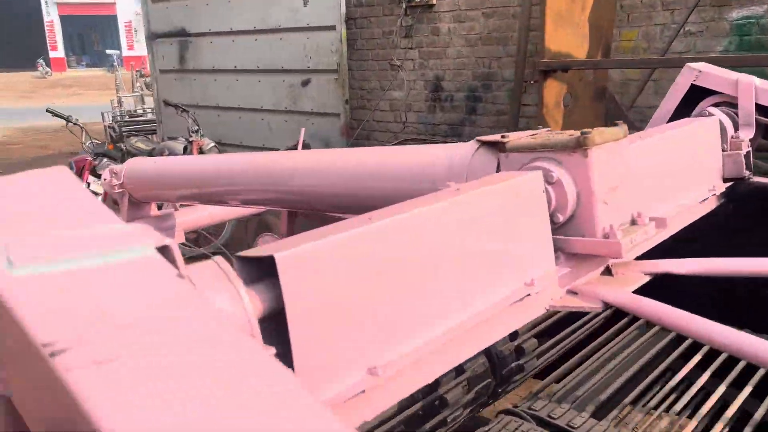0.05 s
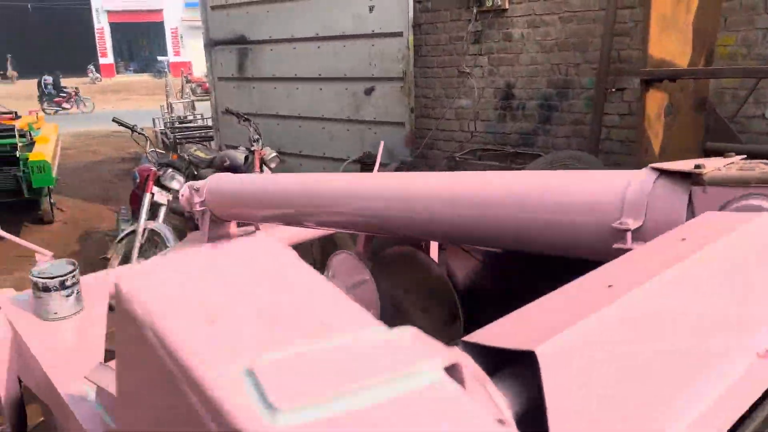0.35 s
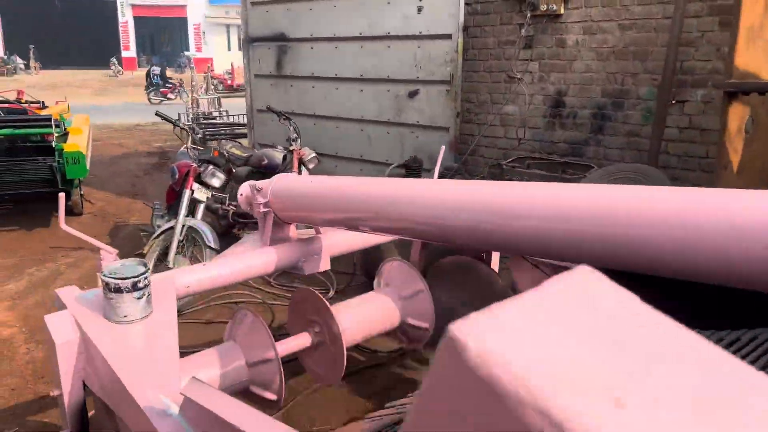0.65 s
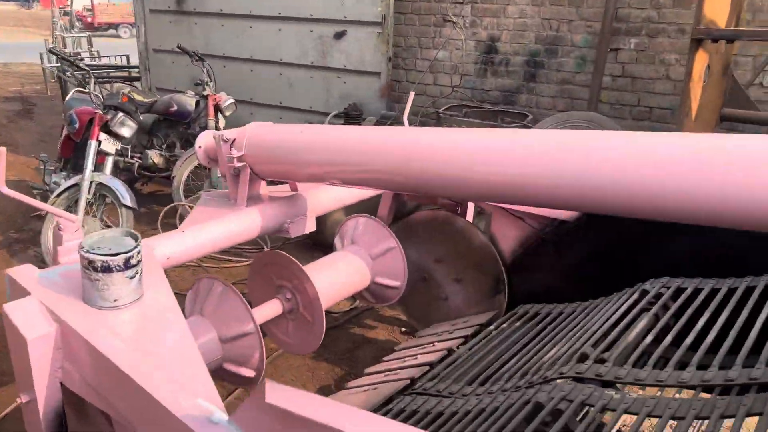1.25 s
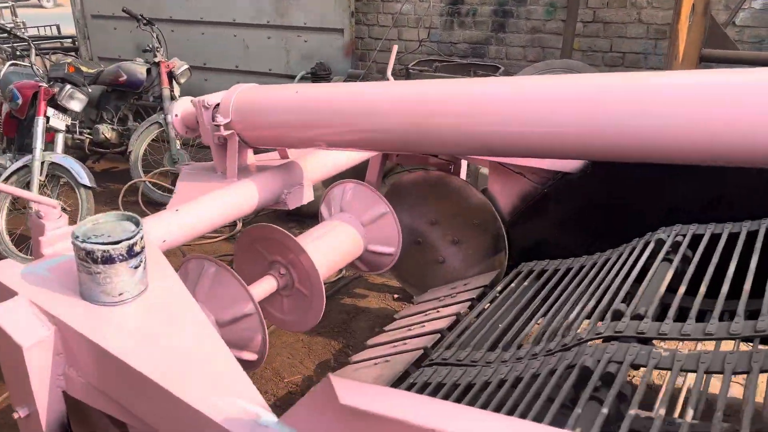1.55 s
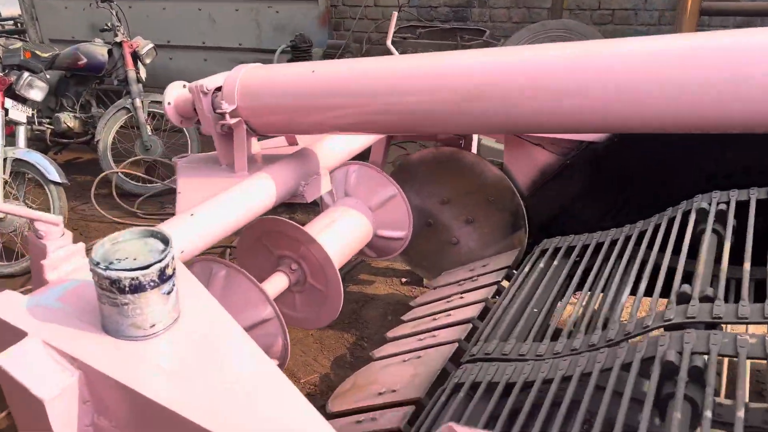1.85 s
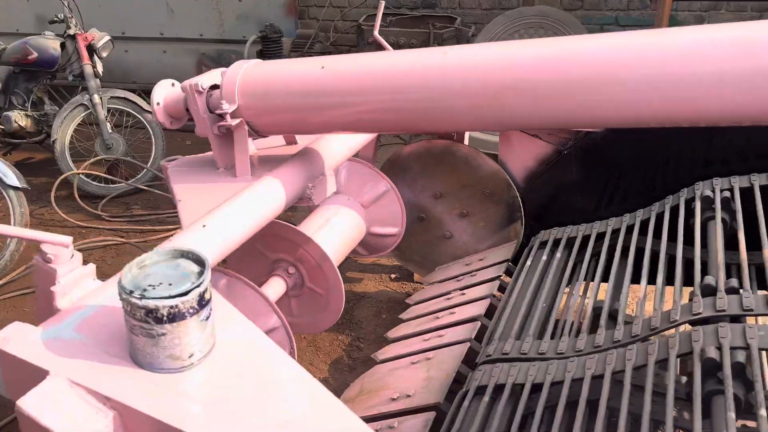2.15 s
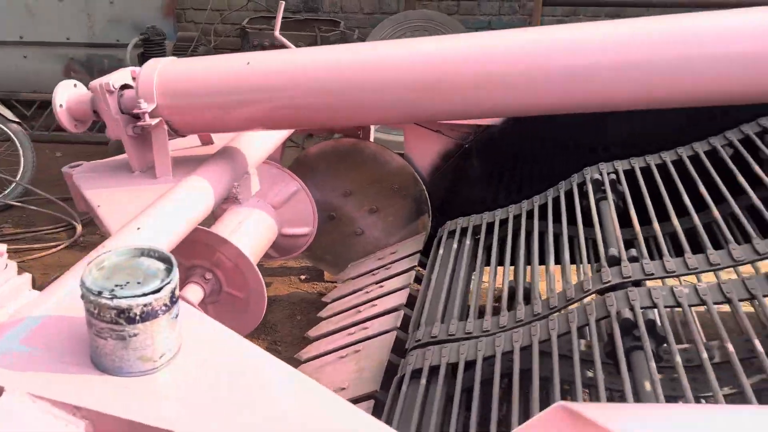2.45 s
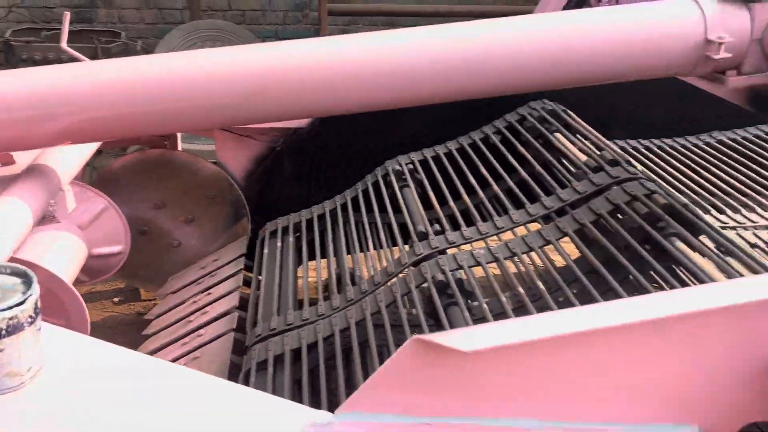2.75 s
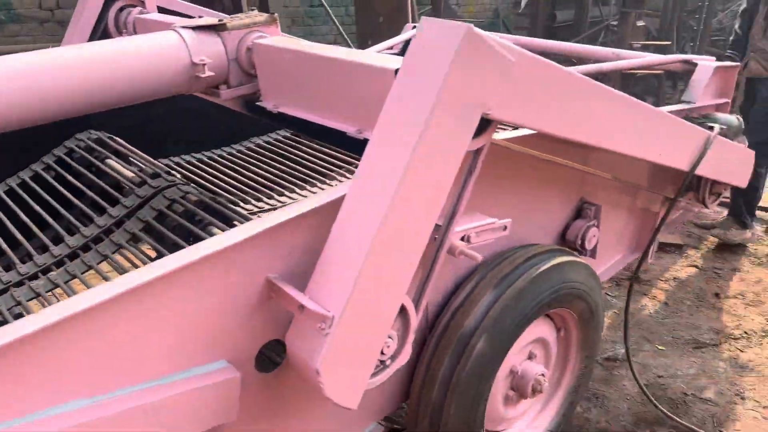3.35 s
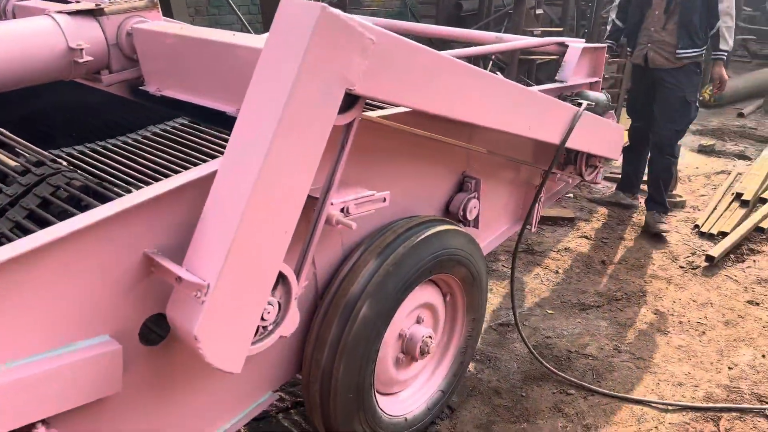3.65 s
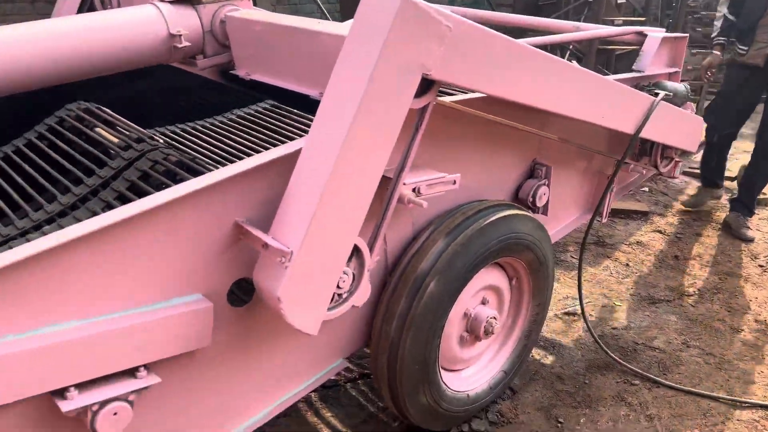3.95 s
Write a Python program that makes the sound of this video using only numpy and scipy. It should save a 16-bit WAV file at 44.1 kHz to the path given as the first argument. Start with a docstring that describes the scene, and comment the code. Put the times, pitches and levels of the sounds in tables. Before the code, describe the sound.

An engine runs steadily close by, a deep drone with a clattering metal casing. Air hisses on the left over a workshop yard's rumble. Near the end the engine sags slightly and something loose ticks quickly.

```python
"""A workshop yard, the microphone carried past a parked farm machine with its engine running steadily.
The exhaust drones at twice the shaft rate; the casing, shaken once a turn, clatters and rings.
A second, fainter engine hums further off over the rumble and roar of the yard; air hisses on the left.
Near the end the engine sags a little, the yard grows louder and something loose ticks in time
with the shaft, amid a fine sizzle."""
import sys
import numpy as np
from scipy import signal
from scipy.fft import rfft, irfft
from scipy.io import wavfile

SR = 44100
rng = np.random.default_rng(int(sys.argv[2]) if len(sys.argv) > 2 else 0)


def store_wav(level_fs):
    """Save 16-bit WAV to argv[1]."""
    pcm = np.round(np.clip(np.atleast_2d(level_fs), -1, 1) * 32767)
    wavfile.write(sys.argv[1], SR, pcm.T.astype(np.int16))


N = 176400
T = np.arange(N) / SR


# The near engine's shaft: time_s, turns_per_s
SHAFT_SPEED = [(0.15, 32.43), (0.4, 32.3), (1.3, 32.3), (2.1, 32.34), (2.65, 32.44), (2.95, 32.25),
               (3.25, 31.28), (3.8, 31.38)]
def shaft(jitter=0.0034):
    """Running count of the turns of a shaft whose speed is never quite even."""
    return np.cumsum(curve(SHAFT_SPEED) * (1 + jitter * wander(16.0))) / SR


# The drone at the microphone: time_s, level_db
DRONE_LEVEL = [(0.05, -24), (0.38, -17), (0.92, -13), (1.66, -11), (3.02, -10.5), (3.22, -12.5),
               (3.44, -11.5), (3.93, -11.5)]
# The overtones above it: time_s, third_order_db, fourth_order_db, other_orders_db
ORDER_LEVELS = [(0.1, -32, -27.5, -30.5), (.65, -32.5, -29.5, -33), (1.15, -31, -33, -35),
                (1.5, -34, -32, -30), (1.95, -24.5, -32, -34.5), (2.9, -32, -30, -40),
                (3.17, -21, -31.5, -29), (3.5, -24.5, -25, -28.5), (4, -32, -27, -39)]
# Balance of those other orders: shaft_multiple, relative_db
OTHER_ORDERS = [(1, -18), (1.5, -19), (5, -1.5), (6, -6), (7, -9), (8, -12), (10, -16), (12, -20),
                (14, -16.5)]
def exhaust(turns):
    """The exhaust, close by: a deep drone of two pulses a turn, with clean and wavering overtones."""
    angle = 2 * np.pi * turns
    drone = unit(np.cos(2 * angle) * (1 + 0.021 * wander(25))) * amp(curve(DRONE_LEVEL))
    third = unit(np.cos(3 * angle)) * amp(curve(ORDER_LEVELS))
    fourth = unit(np.cos(4 * angle)) * amp(curve(ORDER_LEVELS, column=2))
    others = orders(turns, OTHER_ORDERS, waver=0.075, rate_hz=5.9) * amp(curve(ORDER_LEVELS, column=3))
    return (drone + third + fourth + others) * pan(left_db=-0.4)


# Knocks on the casing: frequency_hz, relative_db
KNOCK_SPECTRUM = [(400, -47), (870, -15), (1080, -0.5), (1360, 0.5), (1510, -18), (1720, -1), (1950, -15),
                  (2400, -5.5), (3000, -34), (6000, -30), (12000, -82)]
# Knocks and ring at the microphone: time_s, level_db
CASING_LEVEL = [(0, -30), (.7, -31), (1.3, -33.5), (2, -35.5), (2.8, -37), (3.15, -31.5), (3.5, -32.5),
                (4, -30)]
# Modes of the casing, also struck by the rattles: pitch_hz, relative_db, t60_s
METAL_MODES = [(1077, 3.5, 0.13), (1148, 0, 0.11), (1200, -1, 0.08), (1280, -4.5, 0.072), (1370, -4, 0.053),
               (1654, 0.5, 0.16), (1700, -7, 0.11), (1794, -2, 0.09)]
# Buzz of a sheet panel: frequency_hz, relative_db
PANEL_SPECTRUM = [(1300, -9), (1520, -4.5), (1650, 9), (1780, 10.5), (1950, 0), (2200, -31.5)]
# That buzz at the microphone: time_s, level_db
BUZZ_LEVEL = [(0, -36.5), (.85, -36.5), (1.6, -36), (2.1, -35), (2.8, -37), (4, -35)]
def clatter(turns, ring_db=-5, decay_turns=0.3):
    """The casing is shaken unevenly once a turn; its modes ring on and a sheet panel buzzes along."""
    surge = unit(1 + 1.4 * np.exp(-(turns % 1) / decay_turns))
    shaking = surge * amp(1.6 * wander(20))
    knocks = noise(KNOCK_SPECTRUM, coherence=0.49, lag_ms=0.58, left_db=1.1, drive=shaking)
    t = np.arange(SR // 4) / SR
    modes = sum(damped_mode(t, *mode) for mode in METAL_MODES)
    ring = unit(signal.fftconvolve(knocks, modes[None], axes=1)[:, :N])
    casing = unit(knocks + amp(ring_db) * ring) * amp(curve(CASING_LEVEL))
    panel = noise(PANEL_SPECTRUM, coherence=1.0, lag_ms=0.332, left_db=-1.5, drive=shaking)
    return casing + panel * amp(curve(BUZZ_LEVEL))


# Stronger rattles of the casing: start_s, relative_db, centre_hz
CASING_RATTLES = [(0.209, -31, 1090), (.28, -42, 1780), (.46, -35, 1200), (.63, -34, 1140),
                  (0.83, -33.5, 1080), (1.055, -29.5, 1200), (1.315, -31, 1190), (1.38, -35, 1075),
                  (1.65, -33, 1075), (2.131, -38, 1075), (3.159, -30, 1710), (3.43, -31.5, 1150),
                  (3.45, -35, 1720), (3.495, -34.5, 1300), (3.53, -33, 1140)]
def rattles(gain_db=-0.5, rise_s=0.011, spread_hz=19, diffuse=0.72):
    """Brief flurries of contacts ring the casing, hardest in the modes nearest each centre pitch."""
    t = np.arange(SR // 2) / SR
    flurry = t / rise_s * np.exp(-t / rise_s)
    out = np.zeros((2, N + SR))
    for start_s, level_db, centre_hz in CASING_RATTLES:
        ring = sum(damped_mode(t, hz, db, t60_s) / (1 + ((hz - centre_hz) / spread_hz) ** 2)
                   for hz, db, t60_s in METAL_MODES)
        contacts = (rng.standard_normal(len(t)) + diffuse * rng.standard_normal((2, len(t)))) * flurry
        rattle = signal.fftconvolve(contacts, ring[None], axes=1)[:, :len(t)]
        at = round(start_s * SR)
        out[:, at:at + len(t)] += amp(level_db + gain_db) * rattle / rattle[:, :SR // 20].std()
    return out[:, :N]


# Ticks of a loose part, a turn or two apart: start_s, relative_db, tilt_db_per_octave
LOOSE_TICKS = [(3.238, -40, -1), (3.2719, -32, 4), (3.3363, -32, 2), (3.3664, -28, 4), (3.4311, -32.5, 4),
               (3.4616, -29.5, 3), (3.495, -38, 3), (3.527, -34, 3), (3.5585, -29, 3), (3.5897, -41, 0),
               (3.6226, -29.5, 0), (3.6536, -38, 1), (3.7164, -31, -6), (3.7495, -30, -3),
               (3.8137, -31.5, 1), (3.845, -32, 1), (3.91, -36, 4), (3.9406, -33.5, 4)]
# Resonances of that part: pitch_hz, width_hz, relative_db
TICK_MODES = [(4830, 750, 1.5), (5500, 940, 2), (8530, 840, -6.5), (11360, 1100, -7.5), (12400, 1300, -19)]
def ticks(gain_db=4.5, rise_s=0.002, decay_s=0.0014, tail_db=-17, tail_s=0.014):
    """Each tick is a tiny gritty contact ringing a few broad, high resonances, with a fizzing tail."""
    size = 4096
    t, hz = np.arange(size) / SR, np.fft.rfftfreq(size, 1 / SR)
    since_peak = np.maximum(t - rise_s, 0)
    fall = np.hypot(np.exp(-since_peak / decay_s), amp(tail_db) * np.exp(-since_peak / tail_s))
    envelope = np.minimum(t / rise_s, 1) ** 2 * fall
    out = np.zeros((2, N + size))
    for start_s, level_db, tilt in LOOSE_TICKS:
        ring = sum(amp(db + tilt * np.log2(pitch_hz)) / (1 + 2j * (hz - pitch_hz) / width_hz) ** 2
                   for pitch_hz, width_hz, db in TICK_MODES)
        grit = rng.standard_normal(size) + 0.45 * rng.standard_normal((2, size))
        tick = irfft(rfft(grit * envelope) * ring, size)
        tick *= np.sqrt(np.mean(envelope ** 2) / np.mean(tick ** 2))  # tilt colours it, energy stays
        at = min(round(start_s * SR), N)
        out[:, at:at + size] += amp(level_db + gain_db) * tick
    return out[:, :N]


# Hiss of air: frequency_hz, relative_db
AIR_SPECTRUM = [(1500, -41), (3000, -2.5), (4100, 0.5), (4700, 3.5), (5900, 5.5), (6500, 3.5), (6850, 3),
                (7250, -3), (7700, 1), (8500, -5.5), (9500, -10.5), (11500, -105), (13500, -39),
                (16000, -50)]
# That hiss at the microphone: time_s, level_db
AIR_LEVEL = [(0, -38.5), (.22, -34.5), (.95, -34.5), (1.2, -39.5), (1.47, -34.5), (1.7, -34), (1.9, -36.5),
             (2.15, -32), (2.4, -36), (2.62, -30.5), (2.88, -36.5), (3.2, -33.5), (3.5, -39.5), (4, -38)]
# Whistles within it: middle_s, half_length_s, pitch_hz, relative_db
AIR_WHISTLES = [(.47, 0.076, 5930, -45), (1.5, 0.057, 6200, -43), (1.697, .07, 6030, -38),
                (2.13, 0.072, 6100, -39), (2.665, 0.074, 5600, -40)]
def air(whistle_width_hz=380, drift_hz=50):
    """Left of the microphone, a swelling hiss like an air jet waved about, with breathy whistles."""
    jet = noise(AIR_SPECTRUM, coherence=0.091, lag_ms=0.375, left_db=4)
    jet *= amp(curve(AIR_LEVEL) + 0.5 * wander(28))
    breath = np.array([phasor_wander(whistle_width_hz / 2) for channel in range(2)])
    drift = drift_hz * wander(8.7)
    tones = 0
    for middle_s, half_length_s, pitch_hz, db in AIR_WHISTLES:
        swell = amp(db) * np.exp(-((T - middle_s) / half_length_s) ** 2 / 2)
        tones += swell * np.exp(2j * np.pi * np.cumsum(pitch_hz + drift) / SR)
    whistles = (breath * tones).real  # each tone smears into a narrow band of noise
    return jet + whistles * amp([[2], [-3]])


# Fine sizzle around the ticks: frequency_hz, relative_db
SIZZLE_SPECTRUM = [(3000, -18), (4500, 5), (5300, 1), (5800, 13), (6300, 0), (7200, -24), (8700, 12),
                   (10000, -26), (11200, 5), (12600, -7), (13700, -32), (16000, -32)]
# That sizzle at the microphone: time_s, level_db
SIZZLE_SWELL = [(0, -76), (2, -69), (2.6, -50), (3, -49), (3.3, -42.5), (3.65, -46), (4, -53)]
def sizzle():
    """A faint, flickering treble, spread wide, that comes up with the ticks."""
    flicker = amp(2.8 * wander(210))
    treble = noise(SIZZLE_SPECTRUM, coherence=0.12, lag_ms=0, left_db=1, drive=flicker)
    return treble * amp(curve(SIZZLE_SWELL))


# The distant engine's shaft: time_s, turns_per_s
FAR_SHAFT_SPEED = [(0, 33.6), (1, 33.8), (2, 34.5), (2.7, 34.8), (4, 34.9)]
# Its hum: shaft_multiple, relative_db
HUM_ORDERS = [(4, -7), (5, -4), (6, -1), (7, -7), (8, -12.5), (9, -12.5), (11, -16.5)]
# That hum at the microphone: time_s, level_db
HUM_LEVEL = [(0, -36.5), (1, -33), (1.6, -34.5), (2.4, -28), (3.2, -28.5), (3.6, -33.5), (3.9, -20.5),
             (4, -20.5)]
def far_engine():
    """Further off and a little right, a slightly faster engine of which only the middle orders carry."""
    turns = np.cumsum(curve(FAR_SHAFT_SPEED)) / SR
    hum = orders(turns, HUM_ORDERS, waver=0.48, rate_hz=6.3)
    return hum * amp(curve(HUM_LEVEL)) * pan(left_db=-2)


# The yard's rumble, roar and growl, each: frequency_hz, relative_db
RUMBLE_SPECTRUM = [(20, -40), (40, -24), (75, 0), (115, 7), (160, 0.5), (200, -8.5), (260, -14), (400, -14),
                   (900, -97)]
ROAR_SPECTRUM = [(100, -15), (220, -2), (330, 0), (450, -1), (620, 1.5), (690, 1), (800, -4), (1200, -1.5),
                 (1500, -7.5), (2100, -8.5), (2900, -12), (4000, -17.5), (6000, -24), (8500, -38),
                 (10000, -70), (11500, -26), (13000, -68), (16000, -62)]
GROWL_SPECTRUM = [(150, -8), (270, -15), (340, -1.5), (450, 3.5), (540, 1), (630, 2), (760, -19),
                  (1000, -35), (2500, -63)]
# The same three as the microphone moves on, each: time_s, level_db
YARD_RUMBLE_LEVEL = [(0, -24.5), (.6, -27), (1.05, -27), (1.4, -28.5), (2, -29.5), (3, -27.5), (4, -23)]
YARD_ROAR_LEVEL = [(0, -29), (1, -29), (2.5, -28), (2.9, -29), (3.3, -26), (4, -25.5)]
YARD_GROWL_LEVEL = [(0, -59), (1.7, -44), (2.35, -33.5), (2.9, -39), (3.3, -32), (3.85, -25.5), (4, -28)]
def yard():
    """All around: low rumble, the diffuse roar of machinery between walls, a growing midrange growl."""
    rumble = noise(RUMBLE_SPECTRUM, coherence=0.72, lag_ms=0.36, left_db=2)
    rumble *= amp(curve(YARD_RUMBLE_LEVEL))
    roar = noise(ROAR_SPECTRUM, coherence=0.26, lag_ms=0.49, left_db=-2)
    roar *= amp(curve(YARD_ROAR_LEVEL) + 0.5 * wander(9.4))
    growl = noise(GROWL_SPECTRUM, coherence=0.2, lag_ms=0.25, left_db=-3.5)
    growl *= amp(curve(YARD_GROWL_LEVEL))
    return rumble + roar + growl


def amp(db):
    """Decibels to gain."""
    return 10 ** (np.asarray(db) / 20)


def pan(left_db):
    """Stereo gains that put the left channel left_db above the right."""
    return amp([[left_db / 2], [-left_db / 2]])


def unit(x):
    """Scales to rms 1."""
    return x / np.sqrt(np.mean(x ** 2) + 1e-20)


def curve(rows, column=1):
    """One column of a table, joined by straight lines in time."""
    rows = np.array(rows)
    return np.interp(T, rows[:, 0], rows[:, column])


def wander(rate_hz):
    """Random drift of rms 1, mostly slower than rate_hz."""
    hz = np.fft.rfftfreq(N, 1 / SR)
    return unit(irfft(rfft(rng.standard_normal(N)) / (1 + (hz / rate_hz) ** 4), N))


def phasor_wander(rate_hz):
    """Random drift of both strength and phase."""
    return wander(rate_hz) + 1j * wander(rate_hz)


def damped_mode(t, hz, db, t60_s):
    """A struck mode that falls 60 dB in t60_s."""
    return amp(db - 60 * t / t60_s) * np.sin(2 * np.pi * hz * t)


def noise(spectrum, coherence, lag_ms, left_db, drive=1):
    """Coloured noise at a stereo microphone: a shared part lags on the right, the rest is diffuse."""
    hz = np.fft.rfftfreq(N, 1 / SR)
    points_hz, points_db = np.transpose(spectrum)
    colour = amp(np.interp(np.log(hz + 1), np.log(points_hz), points_db))
    shared, diffuse = rfft(drive * rng.standard_normal((2, N))) * colour
    delay = np.exp(-2j * np.pi * hz * lag_ms / 1000)
    right = coherence * shared * delay + np.sqrt(1 - coherence ** 2) * diffuse
    return unit(irfft(np.array([shared, right]), N) * pan(left_db))


def orders(turns, table, waver, rate_hz):
    """Wavering tones on multiples of a shaft rate."""
    tones = np.zeros(N)
    for multiple, db in table:
        wobble = 1 + waver * phasor_wander(rate_hz)
        tone = np.exp(2j * np.pi * (multiple * turns + rng.random()))
        tones += amp(db) * (wobble * tone).real
    return unit(tones)


def scene():
    """The shaft drives exhaust and clatter; the other sources sound around them."""
    turns = shaft()
    machine = exhaust(turns) + clatter(turns) + rattles()
    return machine + far_engine() + yard() + air() + sizzle() + ticks()


def record(dry):
    """The recorder's band limit, at 15.8 kHz."""
    lowpass = signal.firwin(511, 15800, window=("kaiser", 9), fs=SR)
    return signal.oaconvolve(dry, lowpass[None], "same")


dry = scene()
out = record(dry)
store_wav(out)
```